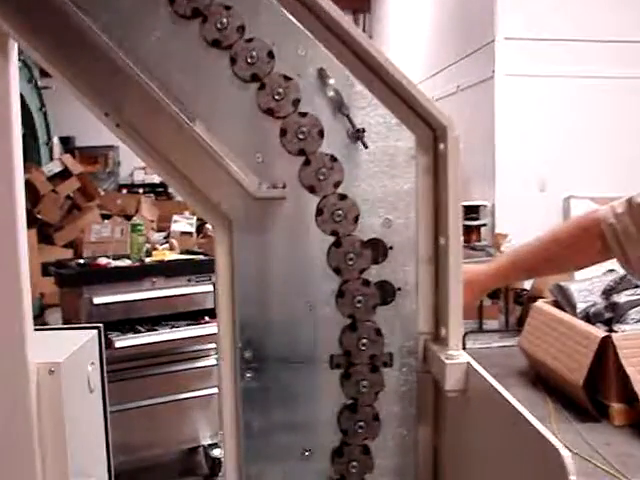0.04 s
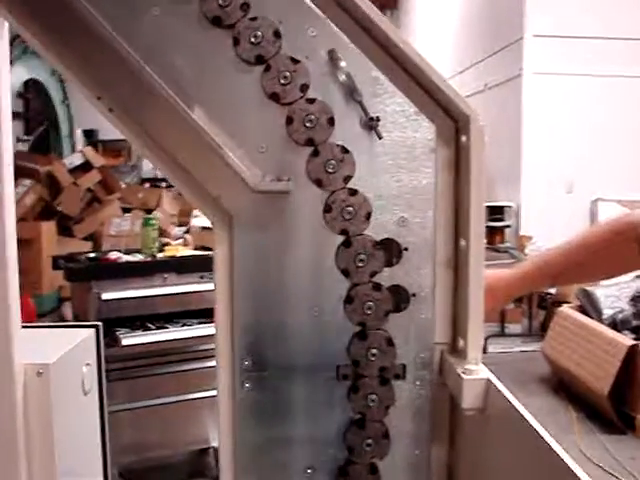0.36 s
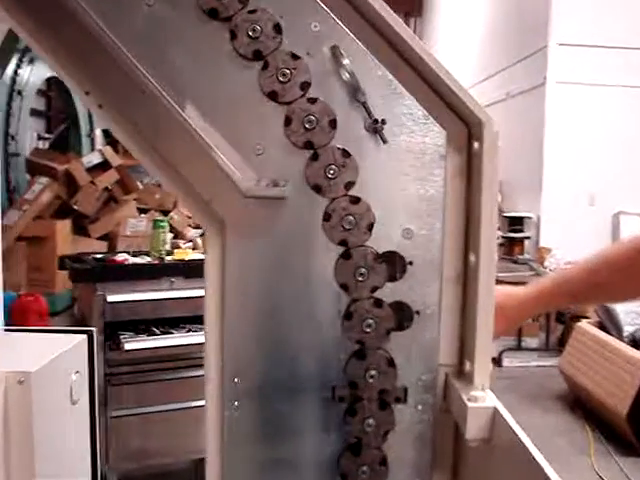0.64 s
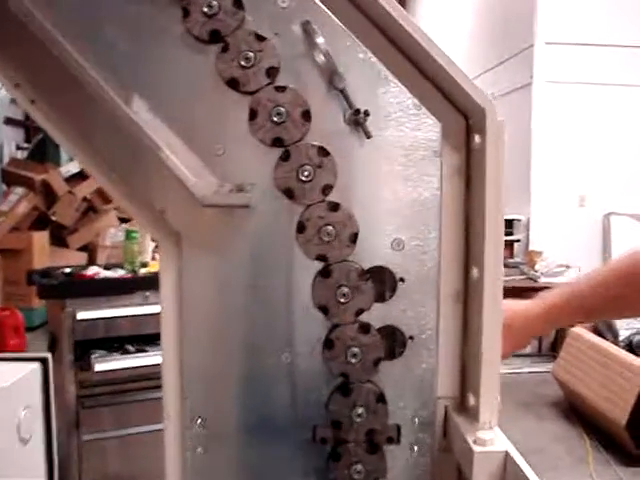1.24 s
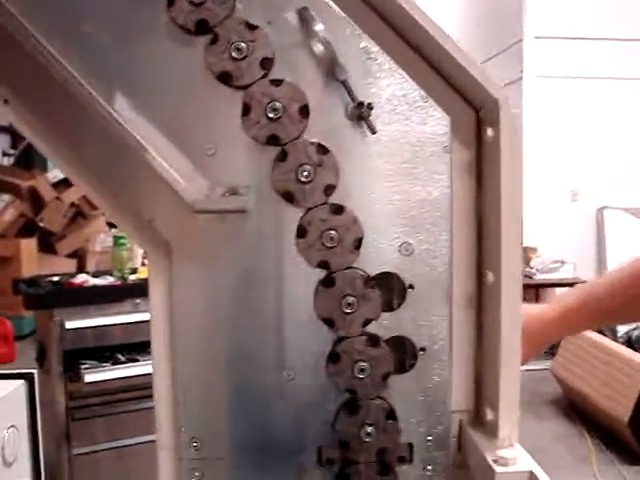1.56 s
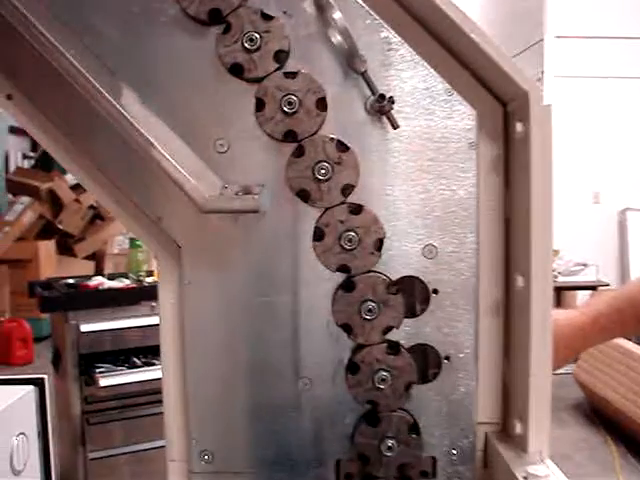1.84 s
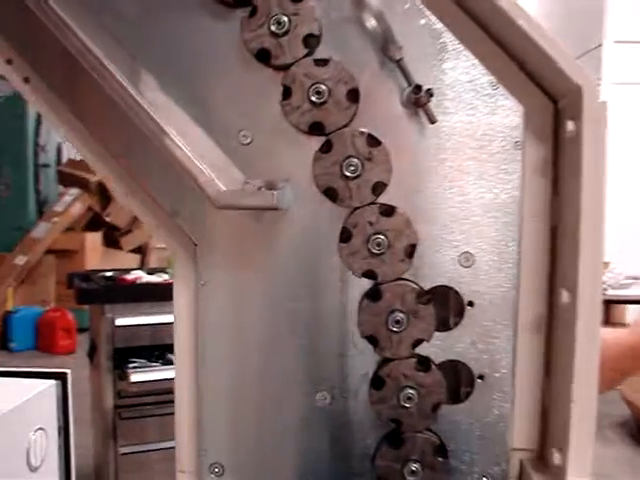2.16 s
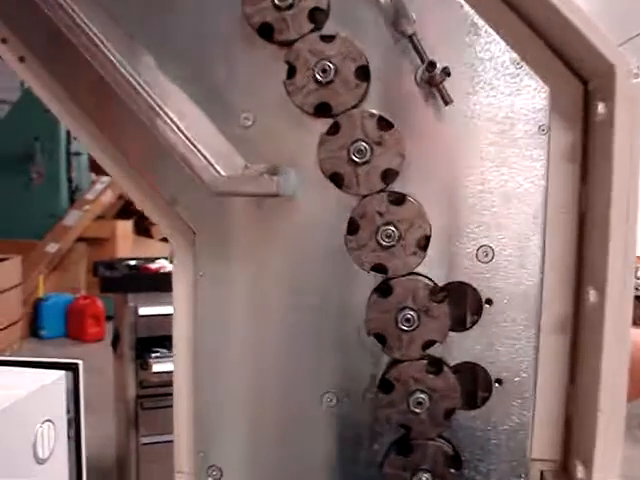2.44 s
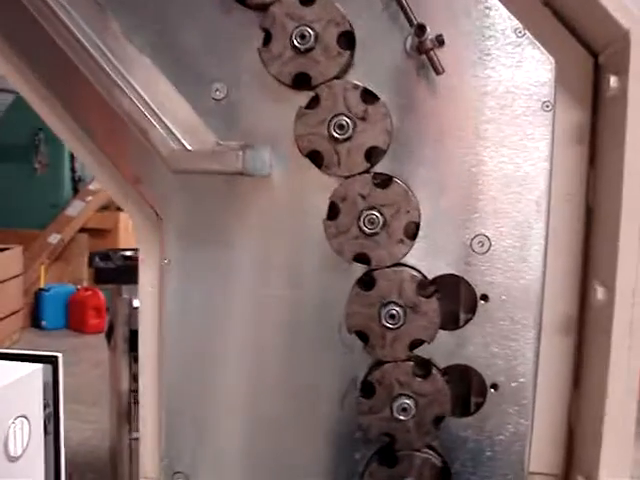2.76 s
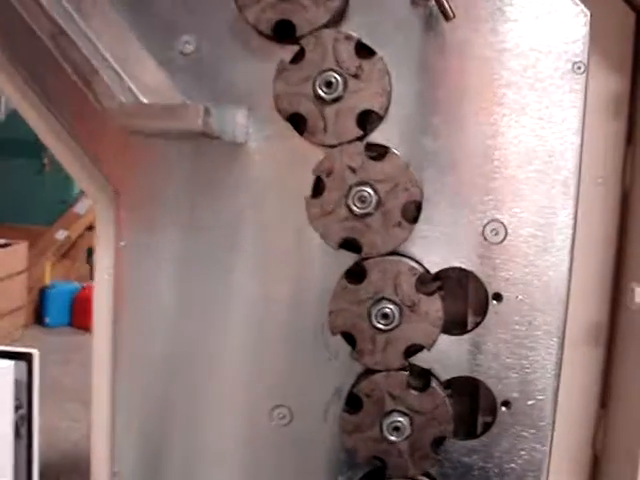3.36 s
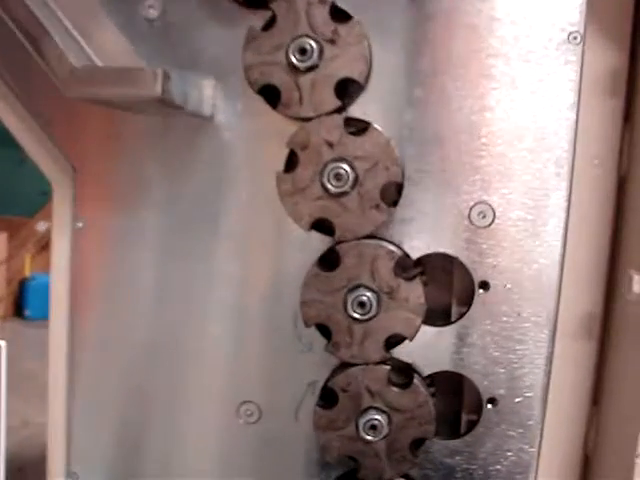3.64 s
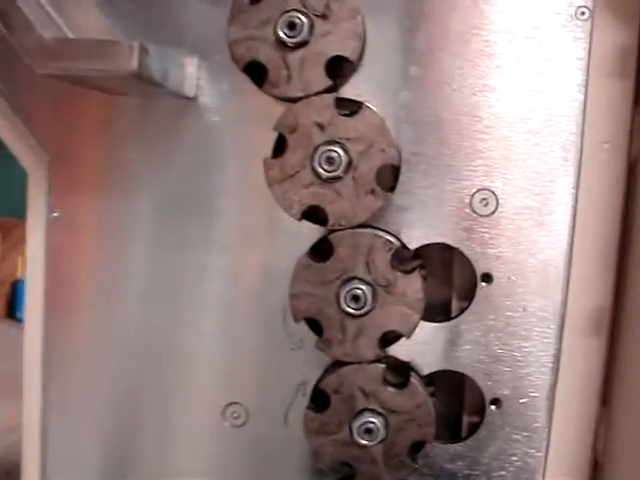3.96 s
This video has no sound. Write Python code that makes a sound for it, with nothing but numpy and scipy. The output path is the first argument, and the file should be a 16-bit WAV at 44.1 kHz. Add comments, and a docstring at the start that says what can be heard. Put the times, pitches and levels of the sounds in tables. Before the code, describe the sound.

A braiding machine runs steadily, heard up close in a workshop. Its steel gears and carriers clatter in rapid, regular pulses with a bright metallic ring, over a low rumble and soft thumps.

```python
"""A braiding machine runs steadily in a workshop, heard from close by. Its drive rumbles from the start.
Loose bobbin carriers rattle in their slots until, about 19 times a second, the chain of slotted horn
gears hands them on in a tight volley of steel knocks. Each impact excites the modes of the track plate
and the gears, and the carriers bounce. A soft low thump is heard with every handover, now and then a
heavier one. Last, the room's reverberation blurs the clatter."""
import sys
import numpy as np
from scipy import signal
from scipy.fft import rfft, irfft
from scipy.io import wavfile

SR = 44100
rng = np.random.default_rng(int(sys.argv[2]) if len(sys.argv) > 2 else 0)


def master_out(mix):
    """Clip the mix to full scale and print it as 16-bit PCM to the path in sys.argv[1]."""
    frames = np.transpose(np.atleast_2d(mix))
    ceiling = np.clip(frames, -1, 1)
    pcm = np.round(ceiling * 32767).astype(np.int16)
    wavfile.write(sys.argv[1], SR, pcm)


N = 176400

# Spectral envelope of the drive's rumble: frequency_hz, relative_level_db
DRIVE_SPECTRUM = [(20, 3.5), (60, -15), (120, -3), (210, -5.5), (270, -14.5), (400, 2), (1000, 0.5),
                  (4000, -27.5), (10000, -43)]
# Lag of the handovers behind an even beat: time_s, lag_s
HANDOVER_LAG = [(0.0, 0.0074), (0.21, 0.0098), (0.31, 0.0087), (0.36, 0.0029), (0.46, 0.0026),
                (0.52, 0.0056), (0.57, 0.0021), (0.67, 0.004), (0.98, 0.0016), (1.19, 0.0074),
                (1.29, 0.0028), (1.34, .0055), (1.39, 0.0028), (1.6, 0.0026), (1.65, 0.0059),
                (1.76, 0.0057), (1.81, 0.0023), (1.96, 0.0071), (2.12, 0.0039), (2.38, 0.01),
                (2.43, 0.0049), (2.58, .0068), (2.63, 0.0024), (2.69, 0.0055), (2.74, 0.0026),
                (3.05, 0.0019), (3.15, 0.0053), (3.36, 0.0014), (3.56, 0.0047), (3.67, 0.0033),
                (3.72, 0.0099), (3.98, 0.0065)]
# Handovers that land harder or softer than the rest: time_s, gain_db
HANDOVER_ACCENTS = [(.52, .7), (.62, .6), (.67, -1.2), (.93, .7), (1.08, 1.5), (1.24, .4), (1.29, -1.1),
                    (1.5, -1.1), (1.6, -.7), (2.58, .6), (2.69, .9), (3.05, -1), (3.36, -1), (3.56, -1.2)]
# Envelope of the track plate's resonances: frequency_hz, relative_level_db
PLATE_SPECTRUM = [(180, -16.5), (260, -16), (320, -32.5), (420, -10.5), (540, 1.06), (780, 0.5), (870, 3),
                  (970, 1), (1120, 4), (1230, 2.5), (1600, 1.1), (2200, 3), (2900, -0.5), (3550, 3),
                  (4400, 0), (5300, -5.5), (6200, -5), (6800, -25.5), (8400, -1.5), (9200, -41)]
# Decay time of the plate's modes: frequency_hz, t60_s
PLATE_DECAY = [(200, 0.27), (600, 0.098), (1300, 0.1), (2500, 0.061), (5000, 0.011), (9000, 0.013)]
# Level of the plate as the listening point moves along it: time_s, gain_db
PLATE_DRIFT = [(0, -0.8), (1.1, 0.3), (2.2, 0.26), (2.999, 0), (4.0, -0.5)]
# Modes of a steel gear and its carrier: pitch_hz, level_db, t60_s, pitch_spread_ratio
STEEL_MODES = [(3270, -8.5, 0.21, 0.017), (3514, -9, 0.11, .02), (3962, 2, 0.071, 0.0088),
               (4082, -0.5, 0.068, 0.0065), (5967, -3.5, 0.028, .018), (6470, -16, 0.04, 0.0096),
               (7255, -14, 0.04, 0.0075), (7450, -17.5, 0.065, .002), (8070, -12, 0.032, 0.0056),
               (8450, -11, 0.058, 0.0028), (8260, -9.5, 0.026, 0.013), (8660, -10, 0.035, 0.0023),
               (8800, -15, .028, 0.0056)]
# Level of the bright ringing over time, with brief treble dropouts: time_s, unscaled_gain_db
TREBLE_LEVEL = [(0.02, 0.4), (0.27, 2.4), (0.48, -0.8), (0.58, 2.5), (0.79, 2.4), (0.89, -2.4), (0.94, 1.5),
                (1.0, -2.8), (1.2, 0.4), (1.31, -2.7), (1.46, 2.9), (1.51, -4.4), (1.56, -0.2),
                (3.63, -0.3), (3.68, 2.4), (3.94, -2.5)]
# The heavier low thumps: time_s, peak_db
HEAVY_THUMPS = [(.33, -46), (1.048, -44), (1.257, -44), (1.774, -42), (2.6, -43), (2.963, -45),
                (3.112, -45), (3.578, -46), (3.947, -42)]

BEATS_PER_S = 19.364
DRIVE_DB, PLATE_DB, GEAR_DB, THUMP_DB = -48.5, -20, -25, -58.5
RATTLE_DB, RATTLE_SPREAD_DB, RATTLE_CROWDING = -21.5, 11, 1.8   # level is relative to a knock
VOLLEY_S, VOLLEY_SKEW = .017, 1.2   # typical length; a skew above 1 crowds the knocks towards the start
VOLLEY_SPREAD, JITTER_S = .2, .0006   # beat-to-beat scatter of relative length and of timing
LEAD_S, BUILD_S = .0018, .0022   # first light touches come early, then the force builds up
BUILD_SPREAD = .36   # some volleys start with a crack, others swell
LIMP_DB, LIMP_STRETCH = .24, .07   # neighbouring gears turn opposite ways, so the beats alternate
KNOCK_SPREAD_DB, BEAT_SPREAD_DB = 2.5, .18
BOUNCE_S, BOUNCE_DB = .011, -6   # mean delay and relative level of each knock's rebound
PLATE_LOW_CUT_HZ, BENDING_DELAY_S = 278, .000989   # group delay through the plate at 1 kHz
TREBLE_LEVEL_SCALE, MODE_SPREAD_DB = .4, 5.5
CLINK_SPREAD_DB, FLARE_DB = 5.5, .62   # scatter of the ringing for each contact and for each whole beat
THUMP_DELAY_S, THUMP_SPREAD_DB, THUMP_WIDTH_S, HEAVY_WIDTH_S = .007, 2, .0045, .003
ROOM_DB, ROOM_T60_S, ROOM_DELAY_S, ROOM_DULL_HZ = -8.5, .36, .012, 2660
UPWARD_LIMIT, DOWNWARD_LIMIT = .5, .66
SHELF_HZ, SHELF_DB, CUTOFF_HZ = 8530, -5.5, 9950


def from_db(db):
    """Amplitude ratio for a level in decibels."""
    return 10 ** (np.asarray(db) / 20)


def rms_one(x):
    """Normalisation to unit mean power."""
    return x / np.sqrt(np.mean(x ** 2) + 1e-20)


def at_hz(table, hz):
    """Interpolation on a logarithmic frequency axis."""
    table_hz, value = np.transpose(table)
    return np.interp(np.log(np.maximum(hz, 1)), np.log(table_hz), value)


def cut(x, hz, kind, order=2):
    """Butterworth filtering: a maximally flat low- or high-pass."""
    return signal.sosfilt(signal.butter(order, hz, kind, fs=SR, output="sos"), x)


def drive_rumble():
    """Stationary noise: the drive's rumble is white noise weighted by a spectral envelope."""
    colour = from_db(at_hz(DRIVE_SPECTRUM, np.fft.rfftfreq(N, 1 / SR)))
    return from_db(DRIVE_DB) * rms_one(irfft(rfft(rng.standard_normal(N)) * colour, N))


def handover_times():
    """Quasi-periodic motion: the even beat of the drive is pulled slightly by the load."""
    even = np.arange(int(N / SR * BEATS_PER_S) + 1) / BEATS_PER_S
    return even + np.interp(even, *np.transpose(HANDOVER_LAG))


def carrier_rattles(beats, count=8):
    """Impacts across a clearance: loose carriers tick in their slots, more often as a handover nears."""
    shape = (count, len(beats))
    times = beats - rng.random(shape) ** RATTLE_CROWDING / BEATS_PER_S
    forces = from_db(RATTLE_DB + RATTLE_SPREAD_DB * rng.uniform(-1.8, 1, shape))
    return np.array([times, forces])


def handover_knocks(beats, count=20):
    """Inelastic impact: each beat's energy is shared among a volley of knocks, each with one rebound."""
    shape = (count, len(beats))
    length, build, early, strength = rng.standard_normal((len(beats), 4)).T
    turn = (np.arange(count)[:, None] + rng.random(shape)) / count   # place in the volley, 0 to 1
    limp = (-1) ** np.arange(len(beats))
    accent_s, accent_db = np.transpose(HANDOVER_ACCENTS)
    accents = np.bincount(np.round(accent_s * BEATS_PER_S).astype(int), accent_db, len(beats))
    delays = VOLLEY_S * np.exp(VOLLEY_SPREAD * length + LIMP_STRETCH * limp) * turn ** VOLLEY_SKEW
    times = beats - LEAD_S - JITTER_S * early + delays
    onset = np.minimum(delays / (BUILD_S * np.exp(BUILD_SPREAD * build)), 1)
    forces = from_db(KNOCK_SPREAD_DB * rng.standard_normal(shape)) * onset
    forces /= np.sqrt(np.mean(forces ** 2, axis=0))
    forces *= from_db(BEAT_SPREAD_DB * strength + LIMP_DB * limp + accents)
    bounce_times = times + BOUNCE_S * 2 * rng.random(shape)
    return np.array([np.vstack([times, bounce_times]), np.vstack([forces, from_db(BOUNCE_DB) * forces])])


def damped_modes(hz, t60):
    """Free vibration: one exponentially decaying sine for each mode, a sixth of a second long."""
    t = (np.arange(SR // 6) / SR).astype("f")
    omega = (2 * np.pi * hz).astype("f")
    damping = (np.log(1000) / t60).astype("f")
    return np.sin(np.outer(omega, t)) * np.exp(-np.outer(damping, t))


def strike(times, forces, responses, stretches=8):
    """Superposition: each contact adds an impulse response to one stretch of track; total power is 1."""
    track = np.zeros((stretches, N + 2 * SR), "f")   # a second of margin at each end
    struck = rng.integers(0, len(responses), times.size)
    starts = np.round(SR + times.ravel() * SR).astype(int)
    for start, force, k in zip(starts, forces.ravel(), struck):
        track[k % stretches, start:start + responses.shape[1]] += force * responses[k]
    return rms_one(track[:, SR:SR + N]) / stretches ** .5


def track_plate(times, forces, modes=700, points=96):
    """Dispersive bending waves: each contact point drives its own mix of modes; the lows arrive late."""
    root_hz_range = np.sqrt([PLATE_SPECTRUM[0][0], PLATE_SPECTRUM[-1][0]])
    hz = np.interp(np.arange(modes) + rng.uniform(.3, .7, modes), [0, modes], root_hz_range) ** 2
    polarity = rng.choice([-1, 1], (points, modes))
    mixture = polarity * from_db(at_hz(PLATE_SPECTRUM, hz)) * np.sqrt(np.gradient(hz))
    ringing = strike(times, forces, mixture.astype("f") @ damped_modes(hz, at_hz(PLATE_DECAY, hz)))
    dispersion = np.exp(-4j * np.pi * BENDING_DELAY_S * np.sqrt(1000 * np.fft.rfftfreq(N, 1 / SR)))
    dispersed = irfft(rfft(ringing) * dispersion, N)
    drift_db = np.interp(np.arange(N) / SR, *np.transpose(PLATE_DRIFT))
    return from_db(PLATE_DB + drift_db) * cut(dispersed, PLATE_LOW_CUT_HZ, "high", order=4)


def horn_gears(times, forces, beats, count=48):
    """Modal ringing: the struck gears share their bright modes, each with its own tuning and balance."""
    hz, db, t60, spread = np.transpose(STEEL_MODES)
    shape = (count, len(hz))
    rank = np.argsort(rng.random(shape), axis=0)
    detune = np.sqrt(3) * (2 * (rank + .5) / count - 1)   # evenly spaced, unit variance
    tunings = hz * (1 + spread * detune)
    balances = rng.choice([-1, 1], shape) * from_db(db + MODE_SPREAD_DB * rng.uniform(-.9, 1, shape))
    responses = np.array([mix @ damped_modes(tuning, t60) for tuning, mix in zip(tunings, balances)])
    treble_db = TREBLE_LEVEL_SCALE * np.interp(beats, *np.transpose(TREBLE_LEVEL))
    beat_db = treble_db + FLARE_DB * rng.standard_normal(len(beats))
    clinks = from_db(beat_db + CLINK_SPREAD_DB * rng.standard_normal(times.shape))
    return from_db(GEAR_DB) * cut(strike(times, forces * clinks, responses), hz=1400, kind="high")


def low_thumps(times, gains, width_s):
    """Time-bandwidth trade-off: soft, smooth bass thumps heard with the clacks, deeper when wider."""
    at = np.round(times * SR).astype(int)
    inside = (at >= 0) & (at < N)
    impulses = np.bincount(at[inside], -gains[inside], N)
    t = np.arange(-SR // 20, SR // 20) / SR
    bell = np.exp(-(t / width_s) ** 2)
    return cut(signal.fftconvolve(impulses, bell, "same"), hz=7.3, kind="high")


def thump_train(beats):
    """A pulse train in the bass: a soft thump is heard with each handover, now and then a heavier one."""
    gains = from_db(THUMP_SPREAD_DB * rng.uniform(-1, 1, len(beats)))
    soft = low_thumps(beats + THUMP_DELAY_S, gains, THUMP_WIDTH_S)
    heavy_s, heavy_db = np.transpose(HEAVY_THUMPS)
    heavy = low_thumps(heavy_s, from_db(heavy_db), HEAVY_WIDTH_S)
    return from_db(THUMP_DB) * rms_one(soft) + heavy


def workshop_reverb(x):
    """Diffuse field: dull reflections decay exponentially; circular convolution has them built up."""
    t = np.arange(N) / SR
    decay = np.exp(-np.log(1000) * t / ROOM_T60_S) * (t > ROOM_DELAY_S)
    tail = cut(rng.standard_normal(N) * decay, ROOM_DULL_HZ, "low", order=3)
    return from_db(ROOM_DB) * np.std(x) * rms_one(irfft(rfft(x) * rfft(tail), N))


def scene():
    """Linear mixing: each stretch of track clatters with its own reverberation, over thumps and rumble."""
    beats = handover_times()
    times, forces = np.hstack([handover_knocks(beats), carrier_rattles(beats)])
    stretches = track_plate(times, forces) + horn_gears(times, forces, beats)
    clatter = sum(stretch + workshop_reverb(stretch) for stretch in stretches)
    return (clatter + thump_train(beats) + drive_rumble())[None]


def record(dry):
    """Asymmetric saturation rounds the highest peaks; the treble drops to a shelf and the top is cut."""
    limit = np.where(dry > 0, UPWARD_LIMIT, DOWNWARD_LIMIT)
    rounded = dry / (1 + (dry / limit) ** 6) ** (1 / 6)
    leak = from_db(SHELF_DB)
    shelf = leak + (1 - leak) / (1 + (np.fft.rfftfreq(N, 1 / SR) / SHELF_HZ) ** 100)
    low_pass = signal.ellip(10, .1, 80, CUTOFF_HZ, fs=SR, output="sos")
    return signal.sosfilt(low_pass, irfft(rfft(rounded) * shelf, N))


dry = scene()
out = record(dry)
master_out(out)
```